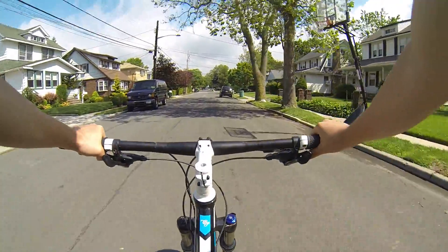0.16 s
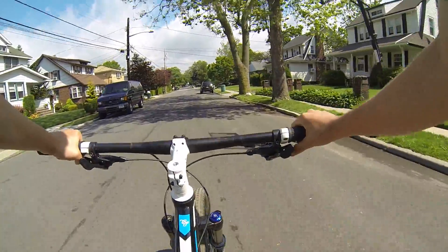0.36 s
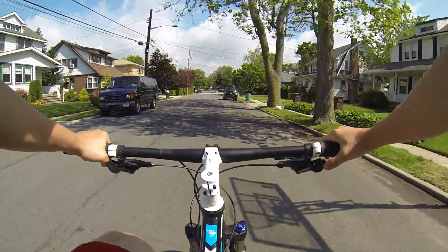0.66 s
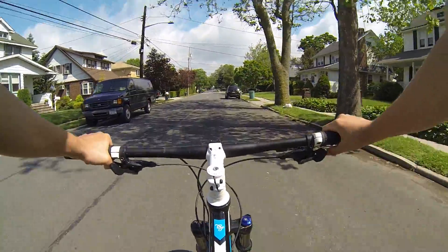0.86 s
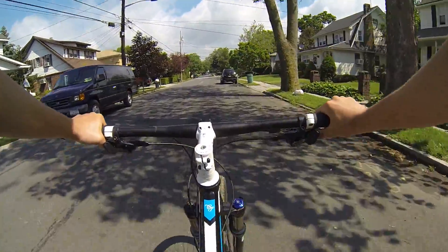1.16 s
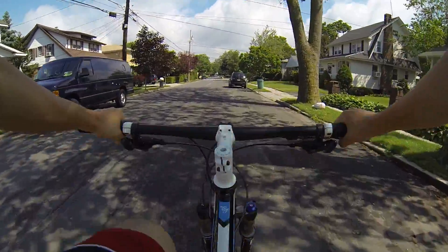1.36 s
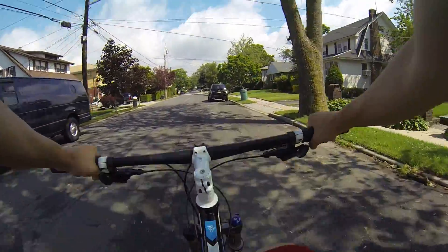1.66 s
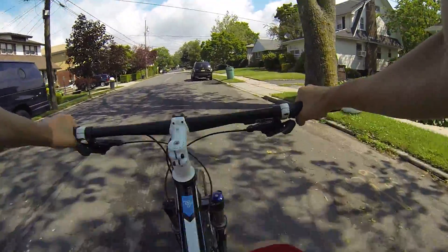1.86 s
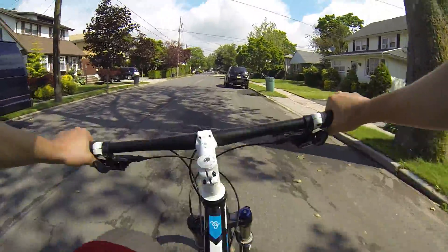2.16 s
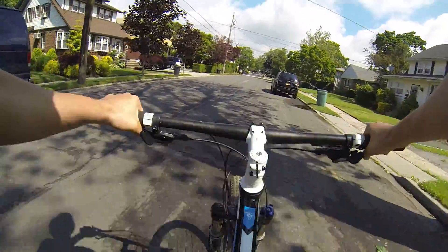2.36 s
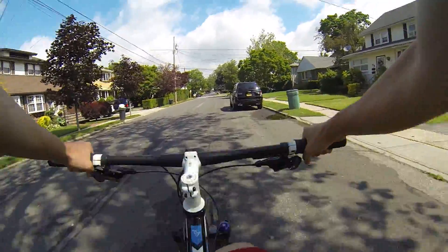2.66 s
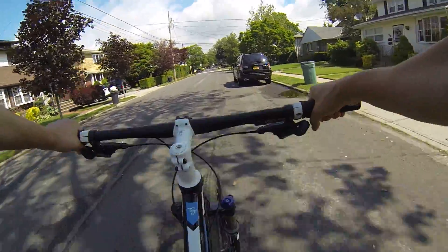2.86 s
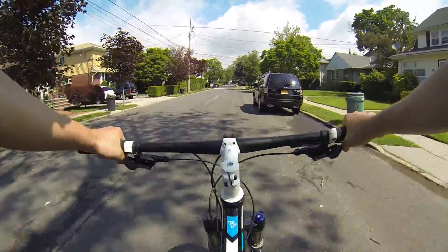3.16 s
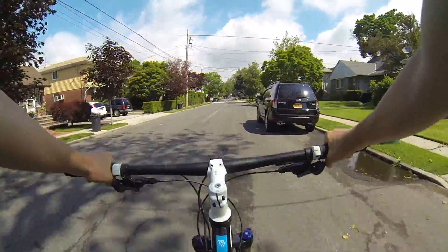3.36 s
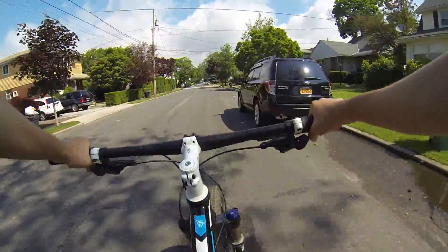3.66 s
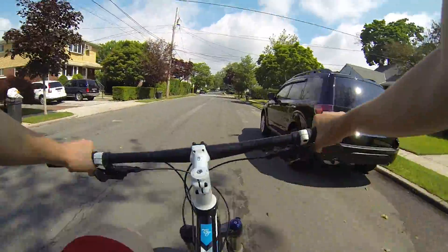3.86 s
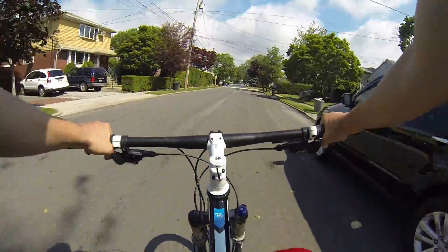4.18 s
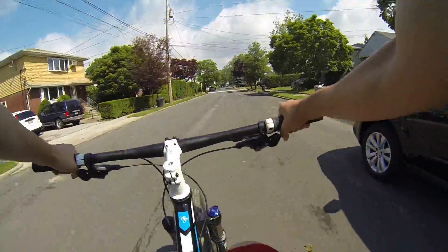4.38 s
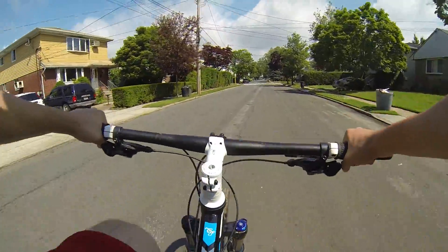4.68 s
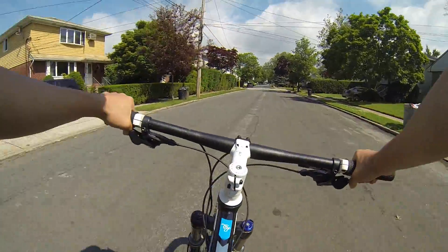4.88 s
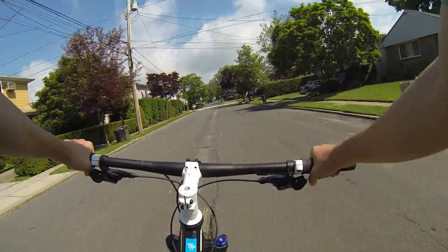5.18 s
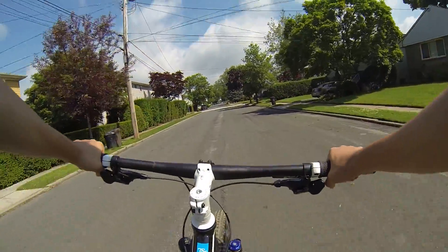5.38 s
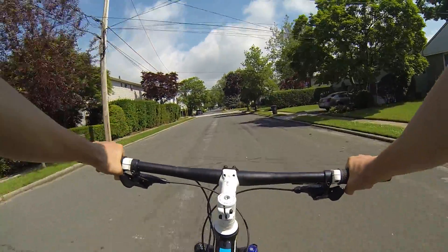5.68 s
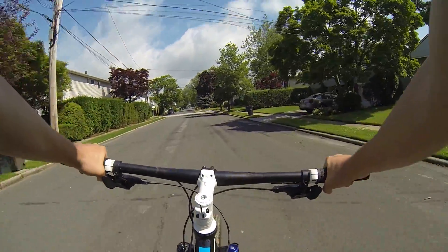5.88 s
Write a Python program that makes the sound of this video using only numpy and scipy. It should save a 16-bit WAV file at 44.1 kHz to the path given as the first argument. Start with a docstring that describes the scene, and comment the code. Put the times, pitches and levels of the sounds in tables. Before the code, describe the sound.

Wind rumbles and buffets a microphone on a moving bicycle; gears snap and clunk early on, then tread hums and a huge gust thumps.

```python
"""A mountain bike on a quiet street, recorded by a cased camera on the rider's chest: filtered noise for
the rush of air and tyres and for gusts on the microphone, a wavering tone and its octave for the tread.
A bird whistles faintly from the trees first; about 0.7 s in, a gear change snaps, then clunks, as noise bursts
ringing a set of modes. Grit ticks; a strong gust comes near 4.7 s, late soft thuds of gusts after 5 s.
The hardest clunk and the strongest gust trip the camera's limiter: the whole ride ducks and swells back."""
import sys
import numpy as np
from scipy import signal
from scipy.fft import rfft, irfft, next_fast_len
from scipy.io import wavfile
from scipy.ndimage import uniform_filter1d, minimum_filter1d

SR = 44100
rng = np.random.default_rng(int(sys.argv[2]) if len(sys.argv) > 2 else 0)


def generate_wav(signal):
    """Clip the signal to [-1, 1] and save it as 16-bit WAV at the path in sys.argv[1]."""
    frames = np.transpose(np.atleast_2d(signal))
    scaled = np.clip(frames, -1, 1) * 32767
    pcm = np.round(scaled).astype(np.int16)
    wavfile.write(sys.argv[1], SR, pcm)


N = 265913
TIME = np.arange(N) / SR


def undb(db):
    """Decibels to gain."""
    return 10 ** (np.asarray(db) / 20)


def unit(x):
    """Scale to rms 1."""
    return x / np.sqrt(np.mean(x ** 2))


def noise():
    """White noise as long as the scene."""
    return rng.standard_normal(N)


def curves(table):
    """Each column of a table, joined by straight lines in time."""
    s, *columns = np.transpose(table)
    return [np.interp(TIME, s, column) for column in columns]


def walk(rate_hz):
    """Smooth random wandering, rms 1."""
    k = max(int(SR / rate_hz), 1)
    held = np.repeat(rng.standard_normal(N // k + 1), k)
    return unit(uniform_filter1d(uniform_filter1d(held, k), k)[:N])


def colour(x, points):
    """Filter by a spectrum of (frequency [Hz], gain [dB]) points, without phase shift."""
    hz, db = np.transpose(points)
    size = next_fast_len(len(x))
    f = np.maximum(np.fft.rfftfreq(size, 1 / SR), 1)
    gain = undb(np.interp(np.log(f), np.log(hz), db))
    return irfft(rfft(x, size) * gain, size)[:len(x)]


def resonate(x, modes):
    """Sum of damped resonances (frequency [Hz], width [Hz], level [dB])."""
    return sum(undb(db) * signal.lfilter(*signal.iirpeak(hz, hz / width, fs=SR), x)
               for hz, width, db in modes)


def add(out, s, sound):
    """Mix a sound in at a time."""
    start = int(s * SR)
    out[start:start + len(sound)] += sound


# faint bird notes: (start [s], length [s], level before the tremble [dB])
NOTES = [(0.327, 0.033, -56), (0.372, .06, -52)]
BIRD_LOW_HZ, BIRD_HIGH_HZ = 4000, 5530  # each note arches from low to high and back, before the waver


def bird(rough=0.45, waver=0.014):
    """Thin whistles from the trees: sines arching in pitch, unsteady in pitch and loudness."""
    out = np.zeros(N)
    wobble, tremble = 1 + waver * walk(900), 1 + rough * walk(300)
    for s, length_s, db in NOTES:
        u = np.clip(2 * (TIME - s) / length_s - 1, -1, 1)  # -1 to 1 across the note
        arch, loudness = 1 - u ** 4, 1 - u ** 24
        hz = (BIRD_LOW_HZ + (BIRD_HIGH_HZ - BIRD_LOW_HZ) * arch) * wobble
        out += undb(db) * loudness * tremble * np.sin(2 * np.pi * np.cumsum(hz) / SR)
    return out


# rush of air and tyres, before the flutter: (time [s], air level [dB], fine hiss level [dB])
RUSH = [(0, -30.5, -60), (0.5, -28.5, -58.5), (0.67, -30, -60), (1.3, -28.5, -57.5), (1.6, -30, -59),
        (2.0, -30.5, -67), (2.2, -30.5, -64), (2.4, -29.5, -60.5), (3.0, -30.5, -61.5), (3.3, -27.5, -59.5),
        (3.5, -27.5, -60.5), (3.9, -28, -61.5), (4.12, -26.5, -58), (4.3, -29.5, -61), (4.62, -27, -56.5),
        (4.79, -30, -59.5), (5.05, -30, -63), (5.35, -28, -62), (5.8, -28, -62), (6.03, -29.5, -63)]
# relative spectra of the air, and of both hiss and grit: (frequency [Hz], density [dB per Hz])
AIR = [(30, -29.5), (180, -4), (265, 3.5), (315, -2.5), (400, 4.5), (520, -5.5), (620, 0.5), (700, -4),
       (1000, -0.5), (1400, -8), (2200, -9.5), (2800, -17.5), (3600, -25), (4400, -48), (6000, -60),
       (16000, -110)]
HISS = [(300, -12), (2500, -8.5), (3800, 12.5), (4400, 1.5), (5400, 9.5), (6000, -1.5), (7400, -7),
        (8600, -4.5), (11000, -8), (12500, -10), (14000, -17.5), (16000, -34)]
# resonances of the camera case: (frequency [Hz], width [Hz], level over the direct sound [dB])
CASE = [(794, 103, 1), (1868, 344, 0.5), (4930, 220, 3), (6500, 260, -0.5), (8600, 1000, 3.5),
        (10250, 990, -1.5)]
# louder ticks of grit flung by the tyres: (time [s], level [dB])
TICKS = [(.432, -44), (2.062, -52), (2.2927, -45.5), (2.451, -53), (2.4892, -49), (2.8025, -46.5),
         (2.8339, -53), (3.1846, -46), (3.239, -50), (3.3528, -53), (3.469, -51), (3.605, -46),
         (3.6431, -50), (4.322, -44.5), (4.5046, -41), (4.5431, -48), (4.6009, -48), (5.3482, -51),
         (5.7104, -49)]
TICK_DECAY_S, TICK_HZ, TICK_WIDTH_HZ, TICK_RING_DB = 0.005, 4930, 450, 4


def cased(points):
    """Coloured noise heard both directly and through the resonances of the camera case."""
    x = colour(noise(), points)
    return unit(x + resonate(x, CASE))


def rush(grit_db=-5, grains_per_s=120, flutter_db=1.04):
    """Fluttering air and tyre noise, with random grains and larger ticks of grit."""
    air_level, hiss_level = curves(RUSH)
    flutter = undb(flutter_db * walk(45))
    air, hiss, grit = cased(AIR), cased(HISS), cased(HISS)
    steady = air * undb(air_level) + hiss * undb(hiss_level)

    # most grains are tiny, a few stand out; each scatters for a moment
    sizes = undb(4.5 * np.minimum(rng.exponential(size=N), 3.5))
    grains = (rng.random(N) < grains_per_s / SR) * sizes
    scatter = np.exp(-TIME[:SR // 50] / 0.0022)
    crackle = unit(signal.fftconvolve(grains, scatter)[:N]) * undb(hiss_level + grit_db)

    # larger grains ping
    ping = unit(grit + resonate(grit, [(TICK_HZ, TICK_WIDTH_HZ, TICK_RING_DB)]))
    ticks = np.zeros(N)
    for s, db in TICKS:
        add(ticks, s, undb(db) * np.exp(-TIME[:SR // 12] / TICK_DECAY_S))
    return flutter * steady + grit * crackle + ping * ticks


# hum of the tread, before drift and trim: (time [s], knob rate [Hz], level [dB])
TREAD = [(0, 396, -46), (3.0, 408.4, -58), (3.3, 410.5, -37.5), (3.6, 418.6, -38), (3.95, 395.3, -32),
         (4.15, 424.7, -28.5), (4.4, 402.4, -40), (5.3, 432.6, -35), (5.72, 421.2, -26), (6.03, 404, -41)]


def tread(trim_db=-1.0, octave_db=-6.0, wander=0.019, drift=0.012, rough=0.32):
    """Knobs slap the asphalt at a slowly drifting, slightly uneven rate: a hum and its octave."""
    hz, db = curves(TREAD)
    uneven_hz = hz * (1 + drift * walk(14) + wander * walk(140))
    phase = 2 * np.pi * np.cumsum(uneven_hz) / SR
    hum = np.sin(phase) * (1 + rough * walk(45))
    octave = undb(octave_db) * np.sin(2 * phase) * (1 + rough * walk(60))
    return unit(hum + octave) * undb(db + trim_db)


# single hard buffets: (centre time [s], envelope peak [dB], thump pitch [Hz], half length to 1/e [s])
BUFFETS = [(0.215, -6.5, 59, 0.025), (2.506, -7, 34.7, 0.032), (2.68, -8.5, 40, 0.015),
           (2.772, -5, 42.4, 0.033), (2.892, -4, 32, 0.015), (3.053, -11, 60, 0.021),
           (4.243, -13, 35, 0.019), (4.366, -7.5, 37.2, 0.022), (4.689, -7, 64, 0.02),
           (4.731, 6, 24.6, 0.02), (4.832, -0.5, 85, .026), (5.153, -2, 26.2, 0.025),
           (5.667, -6, 38, 0.0089)]
SURGE_DB, SURGE_S = 3, 0.034  # each buffet sheds a burst of small eddies


def buffets():
    """Each buffet is a short train of large eddies that push and pull; gives pressure and surge (0 to 1)."""
    pressure, surge = np.zeros(N), np.zeros(N)
    for s, db, hz, half_s in BUFFETS:
        t = TIME - s
        pressure += undb(db) * np.sin(2 * np.pi * hz * t) * np.exp(-(t / half_s) ** 2)
        surge += np.exp(-(t / SURGE_S) ** 2)
    return pressure, np.minimum(surge, 1)


def turbulence(points, hold_s):
    """Coloured pressure noise whose strength is even over spans longer than hold_s."""
    x = colour(noise(), points)
    k = max(int(hold_s * SR), 1)
    power = uniform_filter1d(uniform_filter1d(x ** 2, k), k)
    return unit(x / np.sqrt(power))


# wind at the microphone, before trim and bursts:
# (time [s], slow pressure swings level [dB], small eddies level [dB])
WIND = [(0, -18.5, -25.5), (0.2, -12.5, -22.5), (0.33, -21, -25), (0.41, -16, -26), (0.67, -22.5, -29.5),
        (0.77, -13, -25), (0.87, -9, -17.5), (1.1, -16, -20.5), (1.25, -12, -24.5), (1.42, -12, -22.5),
        (1.52, -5.5, -19), (1.7, -14.5, -20), (1.85, -11.5, -18.5), (1.95, -20, -17.5), (2.03, -12.5, -15),
        (2.22, -16, -27.5), (2.34, -12, -17.5), (2.45, -9.5, -20), (2.61, -14.5, -24.5),
        (2.76, -13.5, -19.5), (2.92, -19, -24), (3.04, -15, -22.5), (3.36, -18.5, -29.5),
        (3.5, -16.5, -31.5), (3.75, -22.5, -29), (3.98, -21.5, -39), (4.15, -18, -26), (4.36, -16, -27),
        (4.54, -17.5, -25.5), (4.7, -14, -20), (4.86, -6.5, -14), (4.97, -5.5, -18), (5.07, -15.5, -29.5),
        (5.23, -10.5, -13.5), (5.33, -15.5, -28.5), (5.44, -12, -24), (5.56, -18.5, -25),
        (5.8, -19.5, -27.5), (5.94, -9.5, -27), (6.0, -11, -18)]
# relative spectra of swings, eddies and tearing: (frequency [Hz], density [dB per Hz])
SWINGS = [(6, -13.5), (15, -1), (28, 9.5), (45, 0), (70, -0.5), (100, -13), (160, -30), (300, -69.5),
          (2000, -130)]
EDDIES = [(40, -35.5), (75, -4.5), (105, -1), (160, -5.5), (260, -11.5), (330, -16.5), (400, -16.5),
          (700, -34.5), (1400, -43), (3000, -58), (6000, -73), (16000, -120)]
TEARING = [(60, -23.5), (250, -3.5), (500, -6.5), (900, -9), (1500, -28), (3000, -47.5), (8000, -89)]
SWING_WANDER_DB, SWING_WANDER_HZ = 1.5, 20  # the strength of the swings is never even


def wind(swing_db=-1, ride=0.16, flutter_db=1, tear_db=-13, tear_growth=1.51, tear_from_db=-16):
    """Large eddies heave the pressure; small ones break off hardest at the crests; gusts tear at the case."""
    swing_level, eddy_level = curves(WIND)
    swings = turbulence(SWINGS, hold_s=0.047)
    thumps, surge = buffets()
    bursts = unit(undb(flutter_db * walk(70)) * np.exp(ride * swings)) * undb(SURGE_DB * surge)
    eddies = turbulence(EDDIES, hold_s=0.088) * undb(eddy_level)
    # the tearing falls away faster than the eddies when the wind eases
    tear_level = eddy_level + (tear_growth - 1) * np.minimum(eddy_level - tear_from_db, 0)
    tearing = unit(colour(noise(), TEARING)) * undb(tear_level + tear_db)
    wander = SWING_WANDER_DB * walk(SWING_WANDER_HZ)
    heave = swings * undb(swing_level + swing_db + wander)
    return thumps + heave + bursts * (eddies + tearing)


# modes that every blow rings, before scatter: (frequency [Hz], width [Hz], level [dB])
RING = [(357, 40, 6.5), (782, 51, 3.5), (947, 530, -7), (1227, 186, -5), (1720, 290, -2.5),
        (1940, 220, -3.5), (2470, 120, -8), (2956, 110, -2.5), (3360, 370, -7), (4000, 360, -12),
        (5010, 630, -9), (6470, 380, -11), (8550, 670, -6), (9330, 390, -7), (10270, 300, -12.5),
        (12900, 1300, -15.5)]
RING_SCATTER = 0.01  # spread, as a share, by which the modes shift from blow to blow
LINK_RATE_HZ = 380  # rate at which the rattle takes a new strength


def blow(s, extra_mode, ring_db, thud_hz, thud_db, edge_db, tilt_db, top_db, rattle_s, contact,
         rise_s=0.000074, grain_db=0, tail_db=-19, tail_s=0.012):
    """A short push and a dying, grainy rattle ring the modes; gives the start time and the sound."""
    t, lead = TIME[:SR // 8], SR // 200

    def rattle(decay_s):
        return rng.standard_normal(len(t)) * np.exp(-t / decay_s) * (1 - np.exp(-t / rise_s))

    chatter, tail = rattle(rattle_s), rattle(tail_s)
    strengths = undb(grain_db * rng.standard_normal(len(t)))
    chatter = chatter * strengths[(t * LINK_RATE_HZ).astype(int)]
    push = chatter / np.linalg.norm(chatter) + undb(tail_db) * tail / np.linalg.norm(tail)
    push[0] += contact
    push = push / np.linalg.norm(push)
    shifted = [(hz * (1 + RING_SCATTER * rng.standard_normal()), width, db)
               for hz, width, db in RING + [extra_mode]]
    # the colouring filter also spreads backwards, so silence leads in
    ring = resonate(np.pad(push, (lead, 0)), shifted)
    # the place of the blow picks a low mode; harder contacts reach the higher ones
    low = [(thud_hz / 1.5, thud_db - 4), (thud_hz, thud_db), (1400, min(thud_db, ring_db) - 3)]
    middle = [(1700, ring_db), (2100, ring_db)]
    edge = [(2800, edge_db - tilt_db), (5200, edge_db + tilt_db)]
    top = [(7500, top_db), (12000, top_db), (16000, top_db - 16)]
    return s - lead / SR, colour(ring, low + middle + edge + top)


# snaps of the shifter and chain: (time [s], level over a unit-energy push [dB], thud over level [dB],
# top over level [dB], tilt of the edge [dB], mode of the struck part before scatter [Hz])
SNAPS = [(0.7307, 0, 15, -23, -6, 3400), (0.904, -8, -2, -6, 4, 5000), (0.9435, 18, 5, 0, -3, 9100),
         (1.062, 21.5, -7, -16, -1, 4700), (1.131, -1.5, 7, -10, -7, 4400),
         (1.1574, 17, 6.5, -4, -4.5, 3760), (1.1723, 1.5, 17, -9, -8, 3800),
         (1.2655, 15, -13, -8.5, 4.5, 5040), (1.289, 7, -1, -22, -8, 2000)]
SNAP_RING_DB, SNAP_THUD_HZ, SNAP_RATTLE_S = 4, 785, 0.0017
PART_WIDTH_HZ, PART_DB = 310, -17  # the struck part adds a mode of its own


def shifter():
    """Hard, bright, very short blows, each also ringing the part it strikes."""
    out = np.zeros(N)
    for s, db, thud_db, top_db, tilt_db, part_hz in SNAPS:
        part = (part_hz, PART_WIDTH_HZ, PART_DB)
        add(out, *blow(s, part, db + SNAP_RING_DB, SNAP_THUD_HZ, db + thud_db, db, tilt_db,
                       db + top_db, SNAP_RATTLE_S, contact=0.49))
    return out


# dull clunks of the chain and frame; the last two rows are gust thuds on the microphone:
# (time [s], level over a unit-energy push [dB], thud pitch [Hz], thud over level [dB],
# edge over level [dB], rattle decay [s])
CLUNKS_AND_THUDS = [(1.316, 16, 1017, -13, -22, .005), (1.33, 26, 966, -3.5, -22.5, 0.0033),
                    (1.424, 15, 1240, 5.5, -16, 0.0056), (1.429, 33.4, 1270, 0.5, -12, 0.0072),
                    (1.538, 12, 805, 4, -17, 0.0024), (1.724, 16, 800, -12, -35, 0.0008),
                    (1.811, 25.8, 750, 2, -20.5, 0.0048), (5.191, 5.5, 700, 19, -29, 0.003),
                    (5.642, 5.5, 799.6, 10, -26, 0.0032)]
# dead, unpitched part of a clunk or thud, before scatter: (frequency [Hz], width [Hz], level [dB])
THWACK = (700, 1500, -6.5)
SETTLE_S, SETTLE_DB, SETTLE_RATTLE_S = 0.0075, -10, 0.027  # delay, relative level and decay of the rattle after
DULL_TOP_DB, DULL_TILT_DB = -17.5, -5.5  # top against edge; tilt of the edge
DULL_RISE_S, DULL_CONTACT = 0.00057, 0.48  # swell of the rattle; first push against the rattle
LINK_DB = 2.5  # uneven strength of the rattle: in a clunk, the chain lands link by link


def chain_and_gust_thuds():
    """Duller blows, each with a softer, longer rattle after it: clunks of the chain, then thuds of gusts."""
    out = np.zeros(N)
    for s, db, thud_hz, thud_db, edge_db, rattle_s in CLUNKS_AND_THUDS:
        first = (s, db, rattle_s)
        after = (s + SETTLE_S, db + SETTLE_DB, SETTLE_RATTLE_S)
        for at, level, decay_s in (first, after):
            edge = level + edge_db
            add(out, *blow(at, THWACK, level, thud_hz, level + thud_db, edge, DULL_TILT_DB,
                           edge + DULL_TOP_DB, decay_s, contact=DULL_CONTACT,
                           rise_s=DULL_RISE_S, grain_db=LINK_DB))
    return out


def scene():
    """Everything meets at one microphone, on the rider's chest."""
    return (bird() + rush() + tread() + wind() + shifter() + chain_and_gust_thuds())[None]


CEILING_DB, ATTACK_S, HOLD_S, RELEASE_S = -1.56, 0.0014, 0.18, 0.32  # limiter of the camera
TOP_HZ = 16000  # upper limit of the camera's sound


def limiter(x):
    """A peak over the ceiling turns everything down at once; the gain holds, then creeps back."""
    over_db = np.maximum(20 * np.log10(np.abs(x) + 1e-9) - CEILING_DB, 0)
    half_hold, attack = max(int(HOLD_S * SR / 2), 1), max(int(ATTACK_S * SR), 1)
    # largest excess within the hold time just past
    held = -minimum_filter1d(-over_db, 2 * half_hold + 1, origin=half_hold, mode="constant")
    fade = np.exp(-TIME / RELEASE_S)
    cut_db = np.maximum.accumulate(held / fade) * fade
    gain_db = uniform_filter1d(minimum_filter1d(-cut_db, attack), attack)
    return x * undb(gain_db)


def record(dry):
    """The camera limits the peaks and cuts the top."""
    low_pass = signal.ellip(8, .2, 70, TOP_HZ, fs=SR, output="sos")
    return signal.sosfilt(low_pass, limiter(dry[0]))[None]


dry = scene()
out = record(dry)
generate_wav(out)
```